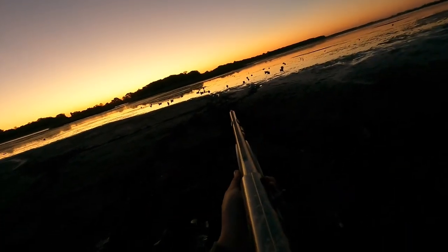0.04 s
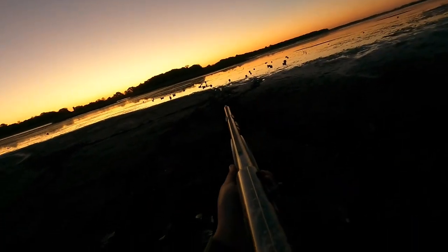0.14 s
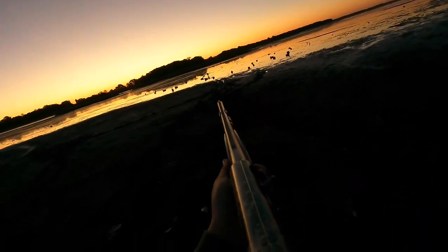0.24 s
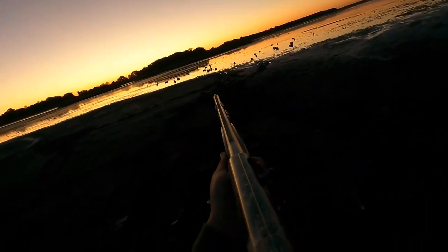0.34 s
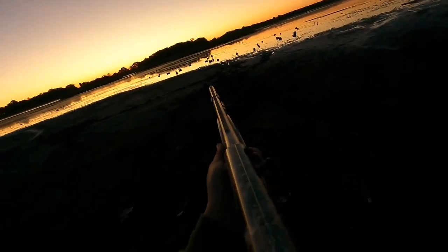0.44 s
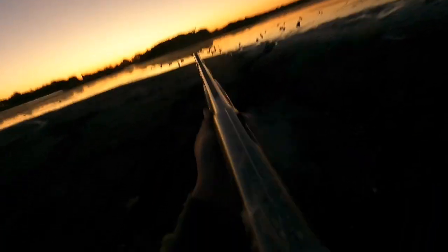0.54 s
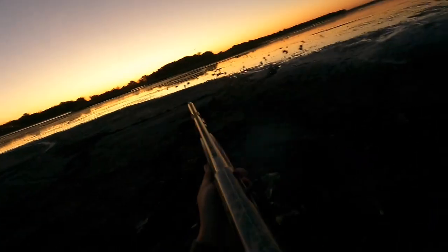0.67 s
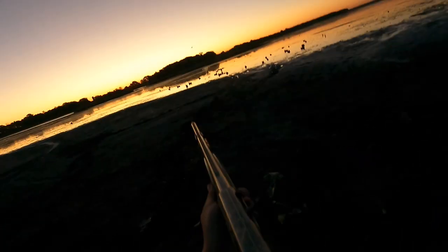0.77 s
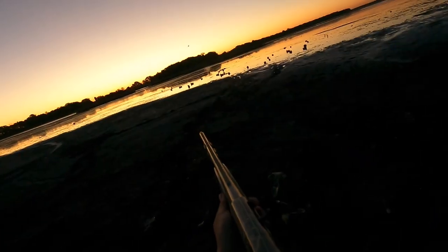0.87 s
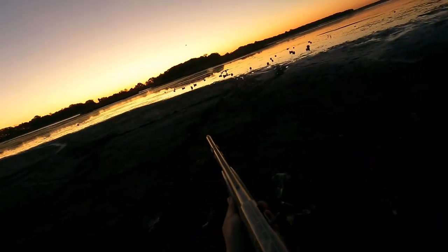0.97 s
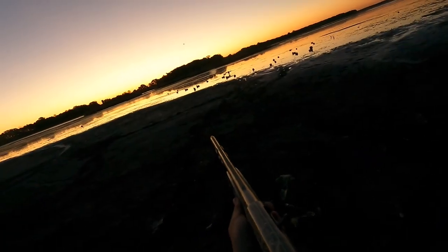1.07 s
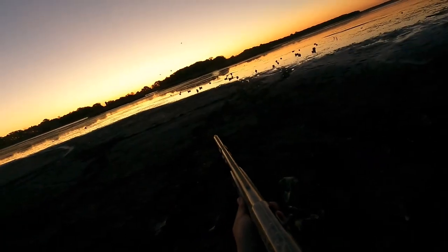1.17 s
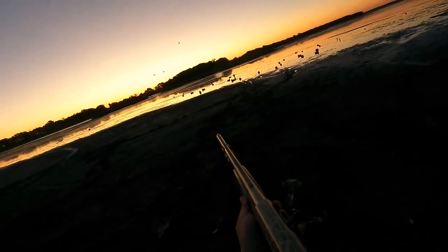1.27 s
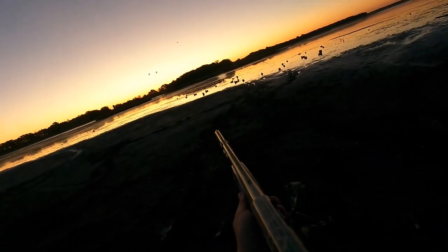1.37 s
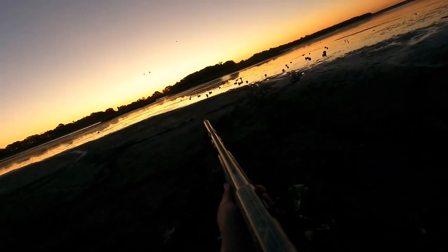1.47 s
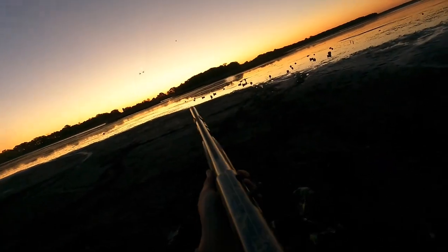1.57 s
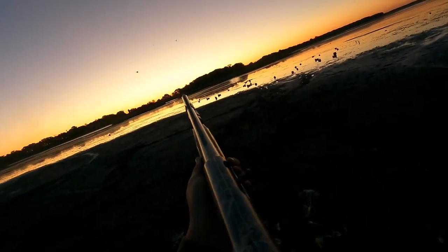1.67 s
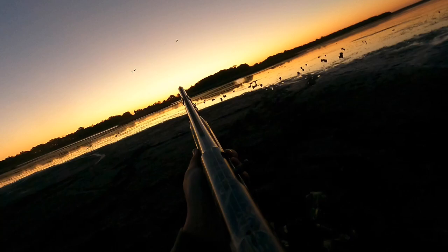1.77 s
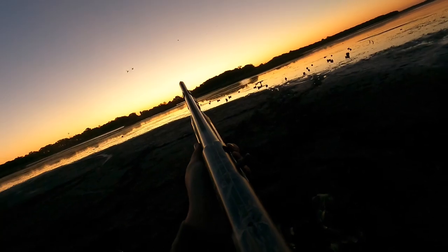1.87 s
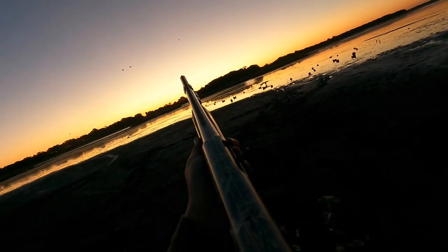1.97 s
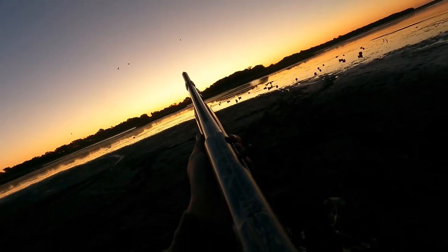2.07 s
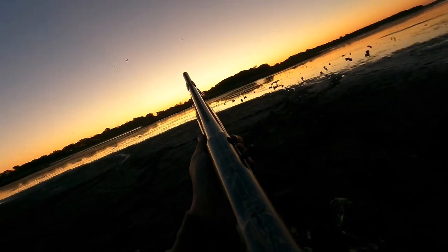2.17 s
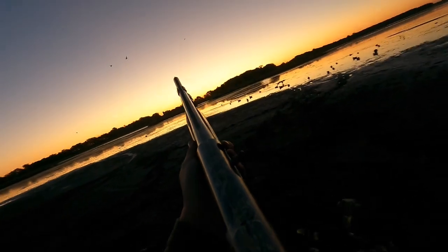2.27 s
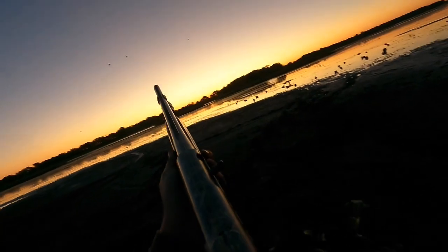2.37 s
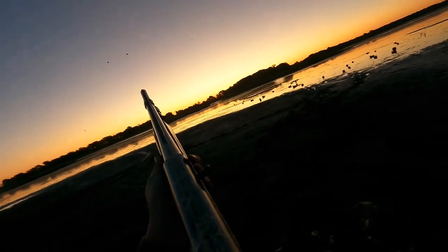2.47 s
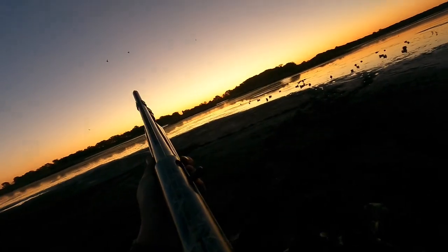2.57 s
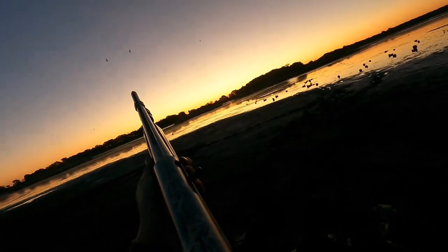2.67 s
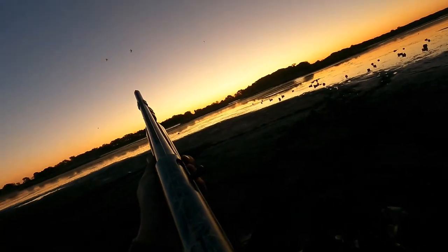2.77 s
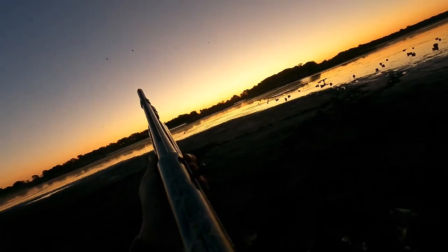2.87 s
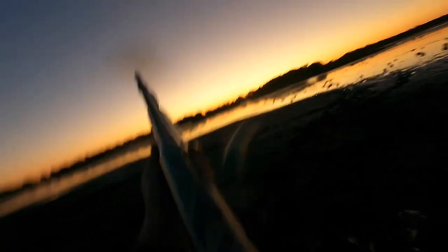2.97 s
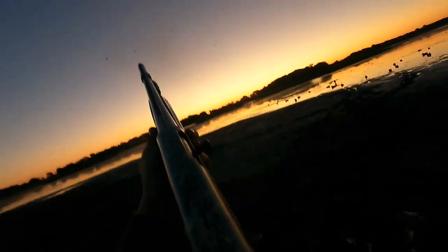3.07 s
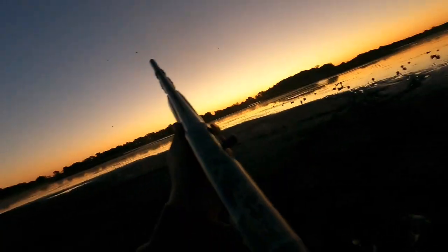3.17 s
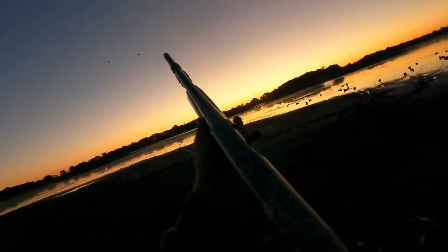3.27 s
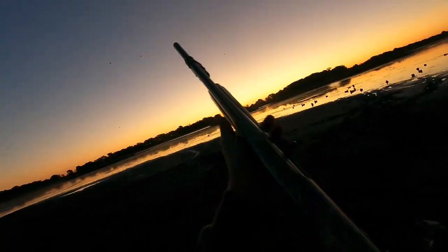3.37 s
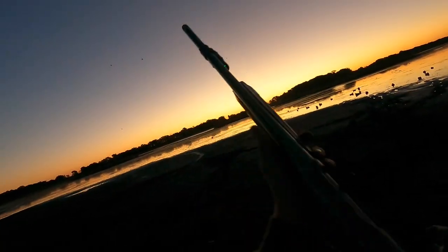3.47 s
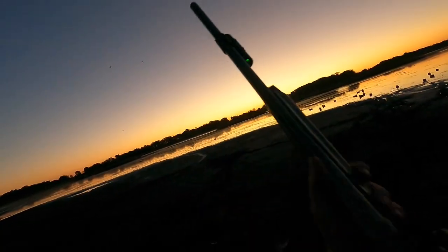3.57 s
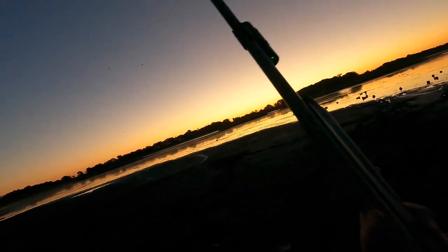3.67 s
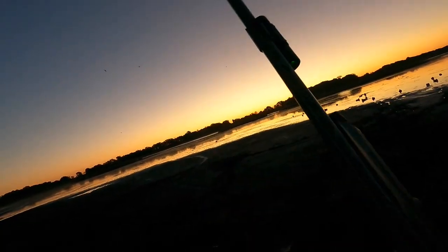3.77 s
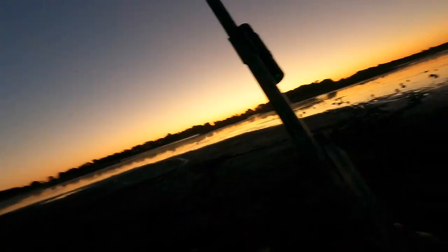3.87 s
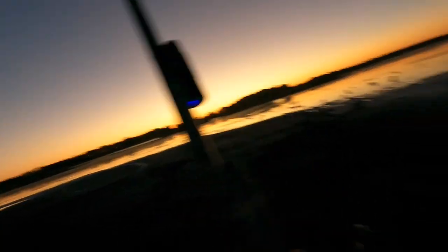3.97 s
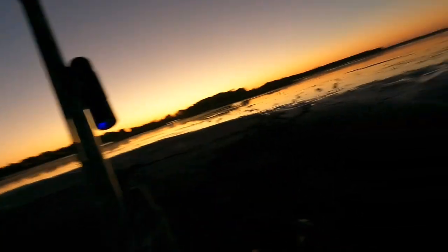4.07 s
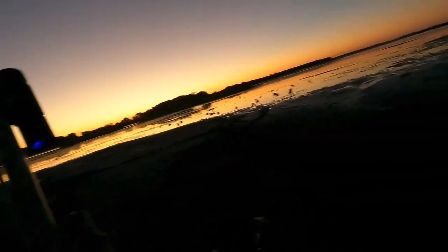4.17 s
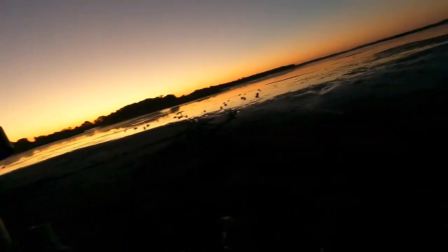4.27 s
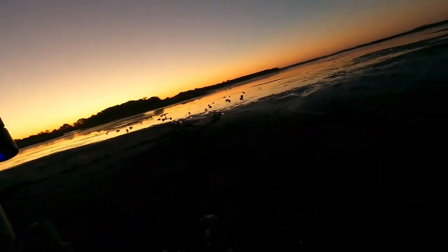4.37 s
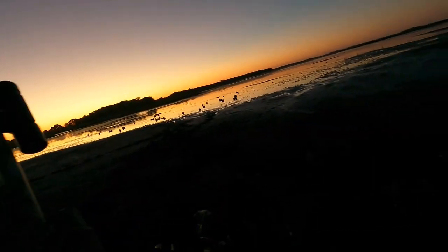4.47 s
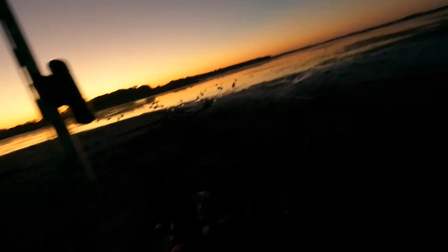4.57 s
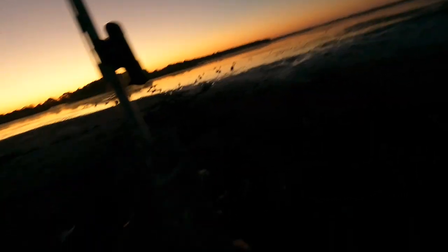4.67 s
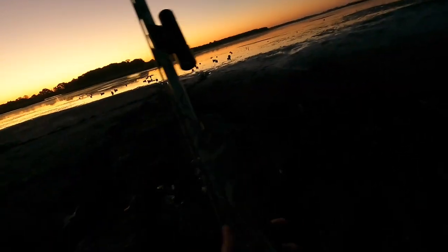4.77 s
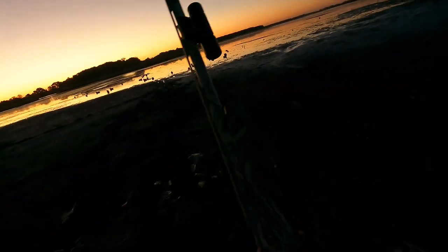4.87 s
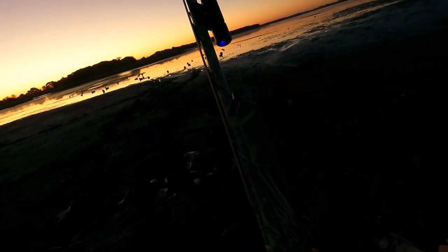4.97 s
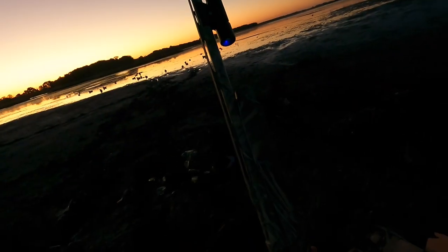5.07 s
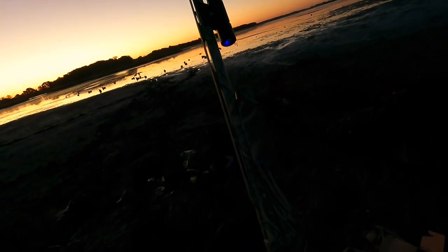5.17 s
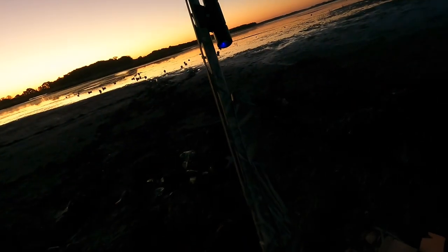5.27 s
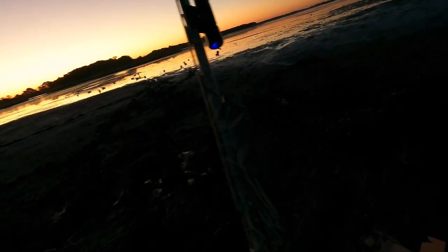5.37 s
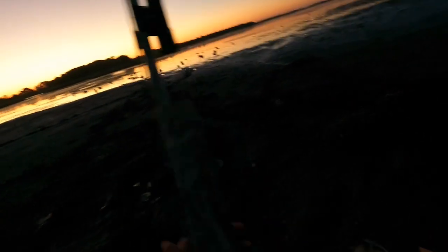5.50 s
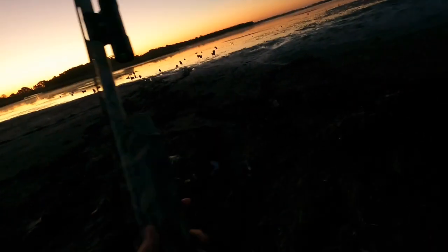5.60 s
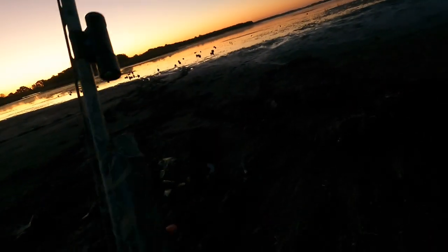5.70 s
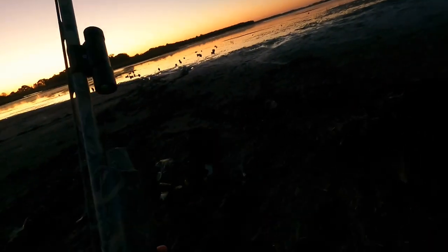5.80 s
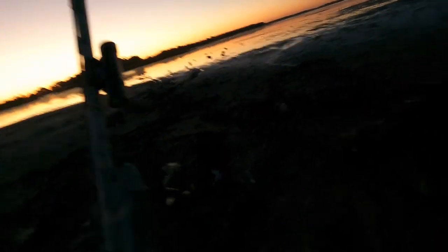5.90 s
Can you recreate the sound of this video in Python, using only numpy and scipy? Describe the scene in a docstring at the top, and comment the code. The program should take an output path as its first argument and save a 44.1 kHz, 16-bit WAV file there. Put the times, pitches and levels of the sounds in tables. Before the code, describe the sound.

Six close shotgun blasts in quick, uneven succession over an open marsh, soft echoes rolling back, then clattering steel as the guns are reloaded.

```python
"""Shotgun volley over a marsh

Shotguns fire over an open marsh, heard on a small head-worn microphone. Each shot swells in low tones, cracks,
booms and scatters off ground and water, all from tones and shaped noise; delayed soft swells answer from far banks.
Between shots the steel actions are worked and reloaded: short rattles driven through resonances.
Lumpy noise makes wind, cloth and reeds; damped low tones make dull thumps, the first likely a distant shot,
the others knocks on the microphone.
"""
import sys
import numpy as np
from scipy import signal
from scipy.fft import rfft, irfft, next_fast_len
from scipy.io import wavfile
from scipy.ndimage import uniform_filter1d, map_coordinates

SR = 44100
rng = np.random.default_rng(int(sys.argv[2]) if len(sys.argv) > 2 else 0)


def persist_wave(psi):
    """Save psi, clipped to +-1, as 16-bit WAV."""
    counts = np.round(np.clip(psi, -1, 1) * 32767).astype(np.int16)
    wavfile.write(sys.argv[1], SR, np.atleast_2d(counts).T)


N = 262005

# The muzzle blasts. Each row: time of the crack in seconds, crack level in dB before a small trim, boom level in dB,
# swell level in dB, swell overtones in dB over their own levels, swell rise as a Gaussian width in seconds,
# hiss in dB over the swell, scatter level in dB, answer of the banks in dB over each bank's level.
SHOTS = [(0.5995, 0.5, -10, -3, -4, 0.015, -11.5, -9.5, -2),
         (1.1106, -2.5, -16, -15.5, -12, 0.0087, -6, -21, 3),
         (1.7148, -1.5, -19, -8, -14, 0.01, -14, -15, -0.5),
         (1.914, -3.5, -10, -10.5, -8.5, 0.0066, -12.5, -15, -2.5),
         (2.43, -3, -14.5, -16, -8.5, 0.0092, -13.5, -16, 5),
         (3.0652, -2, -11, -15.5, -0.5, 0.0089, -4.5, -14, -1)]


def amp(db):
    """Decibels to a linear gain."""
    return 10 ** (np.asarray(db) / 20)


def unit(x):
    """The sound scaled to rms 1."""
    return x / np.sqrt(np.mean(x ** 2) + 1e-20)


def along(points, hz):
    """Reads a curve of (Hz, value) points on a log frequency axis."""
    f, v = np.transpose(points)
    return np.interp(np.log(hz + 1), np.log(f + 1), v)


def curves(rows):
    """One value per sample for each column after the time."""
    s, *cols = np.transpose(rows)
    return [np.interp(np.arange(N) / SR, s, c) for c in cols]


def wobble(rate):
    """A smooth random curve with the given number of knots a second."""
    knots = rng.standard_normal(int(N * rate / SR) + 4)
    return map_coordinates(knots, [np.arange(N) * rate / SR])


def filtered(x, response):
    """The sound shaped by a complex response of frequency."""
    m = next_fast_len(N + SR // 2)
    return irfft(rfft(x, m) * response(np.fft.rfftfreq(m, 1 / SR)), m)[..., :N]


def noise(spectrum):
    """Noise of rms 1 with the given colour."""
    return unit(filtered(rng.standard_normal(N), lambda hz: amp(along(spectrum, hz))))


def resonant(modes):
    """Response of parallel resonances (Hz, width in Hz, dB), alternating in sign."""
    def response(f):
        total = 0
        for k, (centre, width, db) in enumerate(modes):
            damping = 1j * f * width
            total = total + (-1) ** k * amp(db) * damping / (centre * centre - f * f + damping)
        return total
    return response


def fade(since, rise, t60):
    """Climbs 60 dB in rise seconds up to time zero, then falls 60 dB in t60 seconds."""
    return amp(-60 * np.where(since < 0, -since / max(rise, 1e-4), since / max(t60, 1e-3)))


def burst(envelope, sound):
    """The sound under an envelope, holding the envelope's energy whatever the chance of the noise."""
    shaped = envelope * sound
    wanted = np.linalg.norm(envelope, axis=-1, keepdims=True)
    return shaped * wanted / np.linalg.norm(shaped, axis=-1, keepdims=True)


def patchy(x, depth_db):
    """Breaks a sound up with random gain in patches of time and frequency."""
    z = signal.stft(x, nperseg=256)[2]
    field = uniform_filter1d(rng.standard_normal(z.shape), size=5, axis=0)
    field = uniform_filter1d(field, size=3, axis=1)
    return unit(signal.istft(z * amp(depth_db * unit(field)), nperseg=256)[1][:N])


def wash(spectrum):
    """Grainy noise of the marsh, split into its body and its treble."""
    whole = unit(amp(0.77 * wobble(9.2) + 1.9 * wobble(120)) * noise(spectrum))
    treble = filtered(whole, lambda hz: 1 / (1 + (4500 / (hz + 1)) ** 4))
    return whole - treble, treble


def air():
    """Wind buffets and cloth scuffs as lumpy low noise; clothes and reeds rustle as grainy noise above."""
    # Each row: time in seconds, wind buffeting in dB, cloth scuffing in dB.
    wind_levels = [(0, -50, -48), (0.1, -29, -44.5), (0.3, -47, -50), (0.45, -23.5, -33.5),
                   (0.55, -40, -39), (0.72, -34.5, -46), (0.86, -46, -48), (1.25, -54, -50),
                   (1.45, -57.5, -72), (2.1, -64, -75), (2.85, -66, -57), (3.45, -67, -70),
                   (3.78, -52, -50), (3.96, -51.5, -57), (4.02, -59, -65.5), (4.22, -40.5, -38.5),
                   (4.36, -48, -37), (4.44, -51, -56), (4.58, -37, -41), (4.63, -53, -49), (4.71, -39, -37),
                   (4.75, -49, -54), (4.82, -38.5, -35.5), (4.98, -49, -35.5), (5.07, -43, -42.5),
                   (5.15, -45, -46.5), (5.57, -51.5, -55), (5.83, -43, -53.5), (5.94, -57, -50.5)]
    # Clothes and reeds. Each row: time in seconds, rustle level in dB, treble gain in dB.
    rustle_levels = [(0, -55, 14), (0.5, -53, 5.5), (1.5, -54.5, 2.5), (3.5, -62.5, 8.5), (4, -57.5, -20),
                     (4.4, -62, 1), (4.7, -51.5, -2), (4.9, -49, -5.5), (5.15, -57, 2), (5.94, -55, 1.5)]
    # Colour of the wind on the microphone. Each row: frequency in Hz, density in dB per Hz.
    buffet_colour = [(15, -57), (25, -17), (128, -3), (168, -4), (303, -14.5), (369, -28), (400, -20),
                     (520, -48.5), (880, -120)]
    # Colour of cloth on the housing. Each row: frequency in Hz, density in dB per Hz.
    scuff_colour = [(110, -23.5), (180, -3.5), (296, -2), (376, -3.5), (725, -12), (900, -19), (1100, -40),
                    (1950, -57.5), (3300, -120)]
    # Colour of clothes and reeds. Each row: frequency in Hz, density in dB per Hz.
    marsh_colour = [(290, -34), (500, -3), (1950, 2), (2360, -2), (2850, -3), (7100, -18), (8960, -32.5),
                    (11800, -21.5), (16000, -83)]
    buffet_db, scuff_db = curves(wind_levels)
    wash_db, bright_db = curves(rustle_levels)
    buffet = amp(buffet_db) * unit(amp(1.5 * wobble(14) + 2.5 * wobble(40)) * noise(buffet_colour))
    scuff = amp(scuff_db) * unit(amp(1.6 * wobble(28) + 3.2 * wobble(70)) * noise(scuff_colour))
    body, treble = wash(marsh_colour)
    return buffet + scuff + amp(wash_db) * (body + amp(bright_db) * treble)


def hoarse():
    """A faint hoarse band, perhaps far waterfowl: narrow throbbing noise that holds, then fades away early."""
    level_db, hold_s, t60_s = -44, 0.12, 1
    envelope = fade(np.clip(np.arange(N) / SR - hold_s, 0, None), 1, t60_s)
    band = filtered(rng.standard_normal(N), resonant([(1255, 89, 5)]))
    return amp(level_db) * envelope * unit(amp(1.9 * wobble(50)) * band)


def banks():
    """Every far bank sends each shot back as a soft swell of noise, duller the farther it is."""
    # Each row: delay in seconds, level in dB, rise in seconds per 60 dB, t60 in seconds, treble gain in dB.
    far_banks = [(0.271, -52, 0.41, 0.32, 13.5), (0.34, -53.5, 0.4, 0.4, 8.5),
                 (0.65, -40.5, 0.41, 0.65, 3.5), (0.78, -47.5, 0.99, 0.25, -3.5),
                 (1.019, -58, 0.3, 0.5, -9)]
    # Colour of a shot after its long way back. Each row: frequency in Hz, density in dB per Hz.
    far_colour = [(150, -30.5), (250, -2), (316, -16), (722, -5), (1390, -4.5), (1790, -4.5), (2870, -7),
                  (4610, -15.5), (14000, -79.5)]
    t = np.arange(N) / SR
    power = np.zeros((2, N))  # body and treble
    for s, *_, answer_db in SHOTS:
        for delay, db, rise, t60, bright_db in far_banks:
            levels = amp(answer_db + np.array([[db], [db + bright_db]]))
            power += (levels * fade(t - s - delay, rise, t60)) ** 2
    return np.sum(np.sqrt(power) * amp(2.3 * wobble(25.02)) * wash(far_colour), axis=0)


def thumps():
    """A dull thump rings once, low and damped, with an overtone, and leaves a short rustle."""
    # Dull low thumps: the first likely a distant shot, the others knocks on the microphone.
    # Each row: start in seconds, level in dB, pitch in Hz, t60 in seconds, rustle after it in dB over the thump.
    thump_rows = [(0.085, -12.5, 239, 0.021, -11.5), (0.117, -36, 155, 0.23, -7.5),
                  (0.433, -28, 141.7, 0.072, -34), (0.464, -25.5, 144, 0.13, -28.5),
                  (0.909, -27.5, 336, 0.02, -17), (5.306, -31.5, 380, 0.044, -21),
                  (5.437, -35.5, 750, 0.059, -9)]
    # Colour of the rustle. Each row: frequency in Hz, density in dB per Hz.
    rustle_colour = [(200, -17.5), (400, -3), (750, 10), (1300, -19), (2200, -11), (4000, -38.5)]
    t = np.arange(SR // 3) / SR
    out, rustle = np.zeros(N + SR), np.zeros(N + SR)
    for s, db, hz, t60, rustle_db in thump_rows:
        place = slice(round(s * SR), round(s * SR) + len(t))
        ring = np.sin(2 * np.pi * hz * t) + 0.38 * np.sin(2 * np.pi * 2.8 * hz * t)
        out[place] += amp(db) * fade(t - .002, 0.0075, t60) * ring
        rustle[place] += amp(db + rustle_db) * fade(t - .002, 0.0046, 5 * t60)
    return out[:N] + rustle[:N] * patchy(noise(rustle_colour), depth_db=1.5)


def rings():
    """A hard contact leaves thin modes of the steel ringing as decaying sines."""
    # Contacts that ring on. Each row: start in seconds, level in dB.
    hard_contacts = [(2.832, -32)]
    # Modes of the steel. Each row: frequency in Hz, mean level in dB over the contact, t60 in seconds.
    modes = [(4720, 2, 0.069), (5150, 0, 0.08), (6760, -7, 0.13)]
    t, out = np.arange(SR // 3) / SR, np.zeros(N + SR)
    for s, db in hard_contacts:
        for hz, level, t60 in modes:
            mode_gain = amp(db + level + rng.normal(0, 1))
            out[round(s * SR):][:len(t)] += mode_gain * fade(t, 1, t60) * np.sin(2 * np.pi * hz * t)
    return out[:N]


def ticks():
    """Loose parts tick faintly at chance moments while a gun is handled."""
    # Each row: start in seconds, end in seconds, ticks a second.
    handlings = [(0.75, 1.02, 25), (2.7, 2.8, 25), (4.57, 5.1, 45), (5.2, 5.45, 40), (5.8, 5.92, 20)]
    level_db, spread_db, dull_db, t60_s = -47, 6.5, 9, 0.025
    rows = []
    for start, end, rate in handlings:
        for place, size in rng.random((round(rate * (end - start)), 2)):
            moment = start + place * (end - start)
            rows.append((moment, level_db + spread_db * (2 * size - 1), dull_db, t60_s))
    return rows


def actions():
    """Each contact rattles the resonances of the steel and the wooden stock; a dull one leans low."""
    # Steel contacts. Each row: start in seconds, level in dB, dullness in dB, t60 in seconds.
    contacts = [(0.3795, -20.5, 4, 0.018), (0.56, -21, 5, 0.025), (0.6963, -25, -2, 0.018),
                (0.7202, -14, 4, 0.017), (0.726, -4.5, 2, 0.015), (0.8176, -17.5, 2, 0.0086),
                (0.8759, -39, 11.5, 0.12), (0.9348, -22.5, 9.5, 0.0041), (0.9756, -28, 5, 0.0059),
                (0.9884, -30, 7, 0.019), (1.2498, -33, -10, 0.023), (2.0632, -32.5, -10, 0.07),
                (2.2487, -30, -9, 0.046), (2.2599, -17.5, 1, 0.023), (2.2686, -11, -3.5, 0.033),
                (2.4014, -23.5, -4, 0.065), (2.582, -24.5, 1, 0.089), (2.734, -38.5, -5, 0.12),
                (2.7606, -18.5, 1, 0.015), (2.7685, -29, -1.5, 0.16), (2.8083, -22, -12.5, 0.015),
                (2.815, -13, 1, 0.043), (2.827, -11, -10, 0.026), (3.061, -6, -6, 0.0094),
                (3.164, -36, 6, 0.023), (3.1876, -17, 2.5, 0.032), (3.194, -4, 0.5, 0.016),
                (3.2445, -35, -4, 0.02), (3.2596, -14, 0.5, 0.01), (3.499, -44, 3, 0.022),
                (3.869, -53, -12, 0.01), (4.2824, -24, -1.5, 0.014), (4.3852, -11, 9, 0.021),
                (5.0765, -48, 24.5, 0.019), (5.1623, -28, 10.5, 0.017), (5.1679, -17.5, 11, 0.024),
                (5.1864, -19, 10, 0.061), (5.1926, -12.5, 11.5, 0.016), (5.2545, -31, 3, 0.056),
                (5.2674, -29, 9, 0.088), (5.2773, -14.5, 4.5, 0.0056), (5.2845, -12.5, -3, 0.017),
                (5.4306, -24, 5.5, 0.029), (5.4452, -28, 4.5, 0.17), (5.4714, -10.5, 11, 0.0073),
                (5.476, -3, 3, 0.034), (5.4883, 0.5, 5, 0.021), (5.5079, -19, 7.5, 0.032),
                (5.535, -33, 18.5, 0.037), (5.662, -26.5, 1, 0.11), (5.8284, -50, 22.5, 0.0092)]
    # Low, middle and high groups of steel resonances. Each row: frequency in Hz, width in Hz, level in dB.
    steel_modes = [
        [(1890, 585, 0), (2350, 570, -8)],
        [(2600, 400, -6.5), (3800, 790, -2)],
        [(4440, 2700, 2), (7344, 1700, -2.5), (11100, 8700, -15)],
    ]
    # The stock under the action. Each row: frequency in Hz, width in Hz, level in dB.
    stock_modes = [(387, 250, -7.5), (860, 130, 4.5)]
    low_db, middle_db, high_db, stock_db = 0, 6, -6, -9.5  # for a contact of no dullness
    t, drive = np.arange(SR // 5) / SR, np.zeros((4, N + SR))
    for s, db, dull_db, t60 in contacts + ticks():
        envelope = fade(t - .001, 0.001, t60) + amp(-12.5) * fade(t, .001, 3 * t60)
        rattle = burst(envelope, rng.standard_normal((4, len(t))))
        balance = [[low_db + dull_db], [middle_db], [high_db - dull_db], [stock_db + .6 * dull_db]]
        drive[:, round(s * SR):][:, :len(t)] += amp(db + np.array(balance)) * rattle
    return sum(filtered(d[:N], resonant(m)) for d, m in zip(drive, steel_modes + [stock_modes]))


def shots():
    """Each muzzle blast is a tonal swell, a noise crack, a resonant boom, near scatter and a long tail."""
    # Tones of the swell. Each row: frequency in Hz, level in dB; all but the first are overtones.
    swell_tones = [(328, -3), (520, -3.5), (890, -10.5)]
    # Resonances of the boom. Each row: frequency in Hz, width in Hz, level in dB.
    boom_modes = [(121, 110, -3.5), (192, 42, 6), (244, 24, 0), (620, 300, -8)]
    # Colour of the crack. Each row: frequency in Hz, density in dB per Hz.
    crack_colour = [(290, -22.5), (500, 3), (1230, -2.5), (1840, 1.5), (2290, -1.5), (2810, 3.5),
                    (5020, -8), (7000, -10), (8960, -31.5), (11500, -21.5), (16000, -74.5)]
    # Colour of the scatter. Each row: frequency in Hz, density in dB per Hz.
    scatter_colour = [(59, -59), (100, -25), (206, -9.5), (295, -3), (433, -21), (1480, -10), (2750, -11),
                      (6560, -24.5), (9020, -41.5), (11600, -31), (12900, -39), (16000, -99)]
    crest_s = 0.0011  # the swell crests this long before the crack
    boom_lag_s = 0.009  # the boom crests after the crack
    near_s, near_db = 0.028, -7.5  # a near surface: delay, level over the scatter
    crack_t60_s, scatter_t60_s, tail_t60_s, tail_db = 0.017, 0.2, 0.68, -30
    t, out = np.arange(N) / SR, np.zeros(N)
    for s, db, boom_db, swell_db, over_db, rise, hiss_db, scatter_db, _ in SHOTS:
        u = t - s
        # a few low tones swell for some cycles before the crack and sag in pitch as they die after it
        sag = u - 3 * np.clip(u, 0, .1) ** 2
        tones = 0
        for k, (hz, level) in enumerate(swell_tones):
            tones = tones + amp(level + over_db * (k > 0)) * np.sin(2 * np.pi * (hz * sag + rng.random()))
        v = u + crest_s
        swell = tones * np.where(v < 0, np.exp(-.5 * (v / rise) ** 2), fade(v, 1, 0.12))
        swell += amp(hiss_db) * np.abs(swell) * noise(crack_colour)  # a rattling hiss on each crest

        push = fade(u - boom_lag_s, 0.05, 0.06) + amp(-25) * fade(u - boom_lag_s, 0.023, 0.19)
        boom = burst(push, filtered(rng.standard_normal(N), resonant(boom_modes)))

        crack = amp(db - 0.5) * burst(fade(u - .001, 0.0073, crack_t60_s), noise(crack_colour))
        # a near surface answers, duller
        near = burst(fade(u - near_s, 0.0065, 0.024), noise(scatter_colour))
        near = amp(scatter_db + near_db) * near

        # reeds and ripples send back uneven lumps of the blast
        spread = amp(scatter_db) * fade(u - .004, 0.0014, scatter_t60_s)
        spread += amp(tail_db) * fade(u - .01, .02, tail_t60_s)
        lumps = amp(1.3 * wobble(30.05) + 1.2 * wobble(150))
        scatter = spread * lumps * patchy(noise(scatter_colour), depth_db=3.5)
        out += amp(swell_db) * swell + amp(boom_db) * boom + crack + near + scatter
    return out


def scene():
    """Sums all sources, softens the top and spreads the treble over two channels."""
    # Dip that the microphone housing leaves in the steel: centre in Hz, width in Hz, depth from 0 to 1.
    notch_hz, notch_width, notch_depth = (9000, 730, 0.91)
    # Difference of the two channels. Each row: frequency in Hz, level in dB.
    apart = [(2000, -65.5), (5000, -35), (9000, -21.5), (13000, -5)]
    roll_hz = 13100  # the microphone falls away above

    def steel_response(hz):
        dip = 1 - np.clip(notch_depth, 0, 1) / (1 + ((hz - notch_hz) / notch_width) ** 2)
        return dip / (1 + (hz / roll_hz) ** 24)

    steel = filtered(actions(), steel_response)
    mid = air() + hoarse() + banks() + thumps() + rings() + steel + shots()
    mid = filtered(mid, lambda hz: amp(-7 / (1 + (roll_hz / (hz + 1)) ** 16)))
    # the two ports differ mainly in the treble, smeared over some hundredths of a second
    smear = rng.standard_normal(SR // 20) * np.hanning(SR // 20)
    smeared = signal.fftconvolve(mid, smear / np.linalg.norm(smear), "same")
    side = filtered(smeared, lambda hz: amp(along(apart, hz)))
    return np.array([mid + side, mid - side])


def record(dry):
    """The microphone loses the deepest bass, the loudest peaks saturate; nothing is kept above the band limit."""
    foot_hz, top_hz = 72, 16400
    thin = filtered(dry, lambda hz: (1j * hz / (foot_hz + 1j * hz)) ** 2)
    soft = thin / (1 + np.abs(thin / .97) ** 8) ** (1 / 8)
    return filtered(soft, lambda hz: np.clip((top_hz - hz) / 500, 0, 1) ** 2)


dry = scene()
out = record(dry)
persist_wave(out)
```